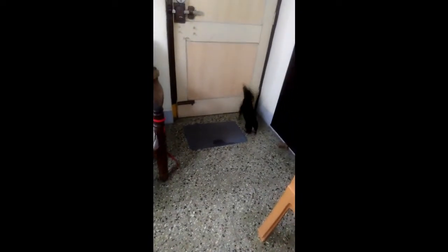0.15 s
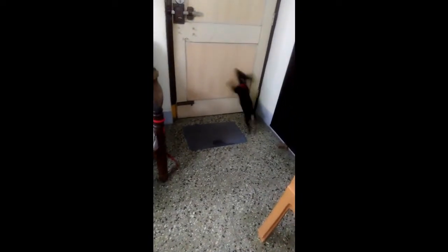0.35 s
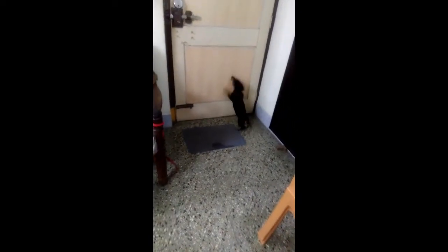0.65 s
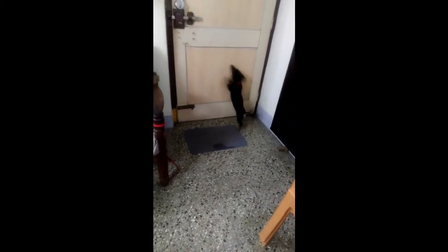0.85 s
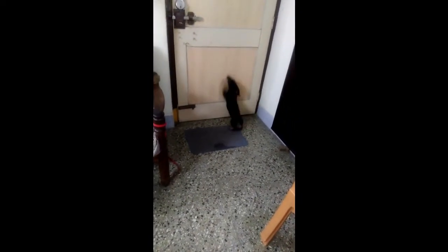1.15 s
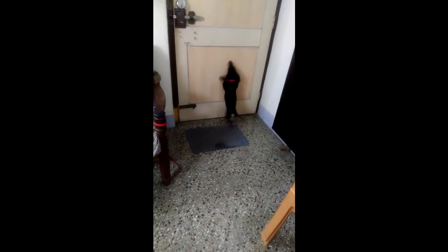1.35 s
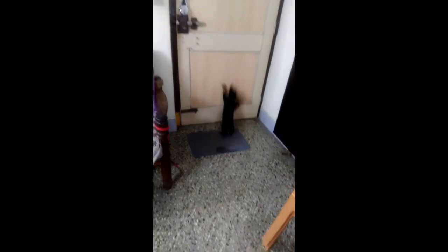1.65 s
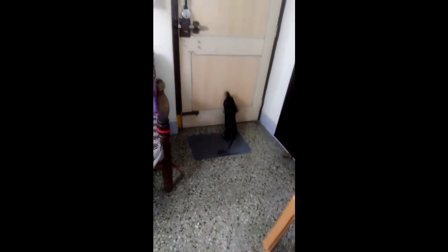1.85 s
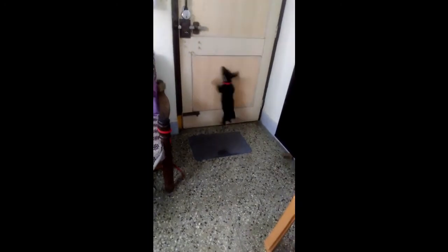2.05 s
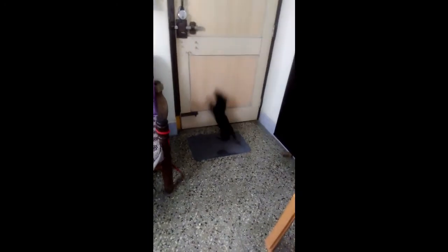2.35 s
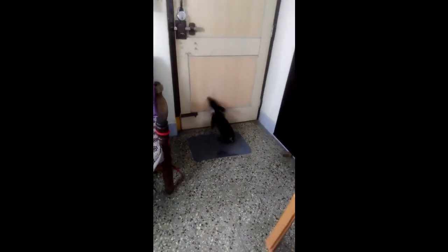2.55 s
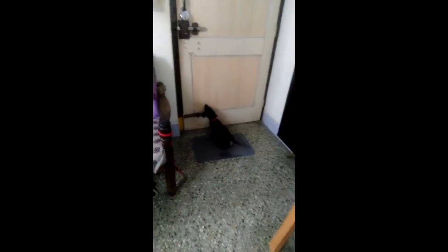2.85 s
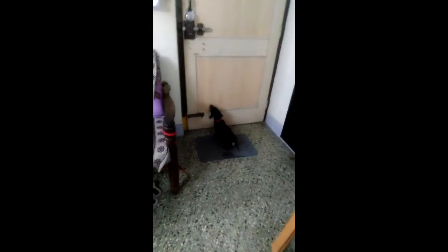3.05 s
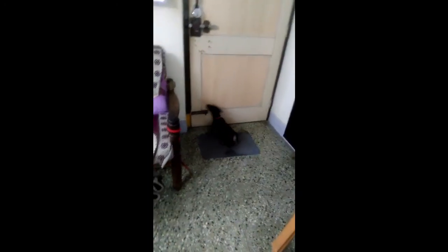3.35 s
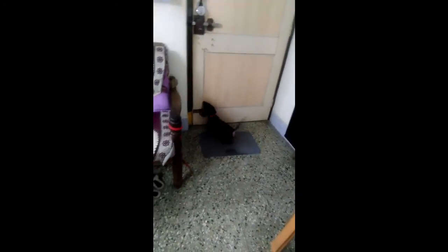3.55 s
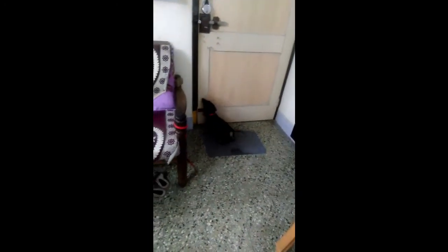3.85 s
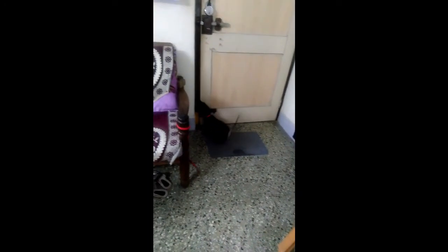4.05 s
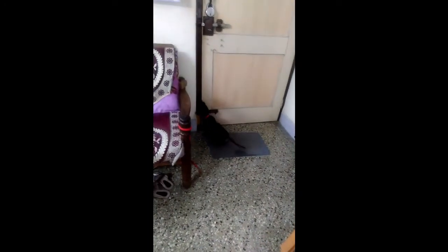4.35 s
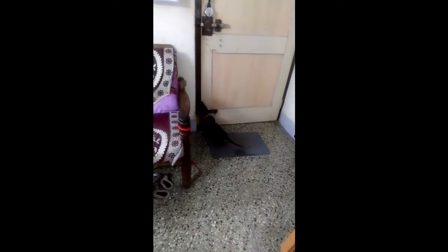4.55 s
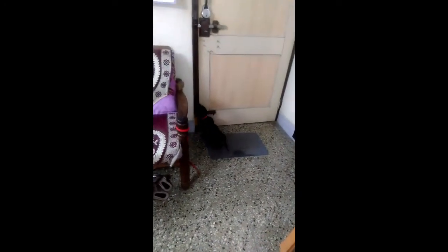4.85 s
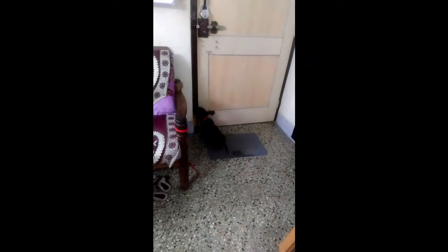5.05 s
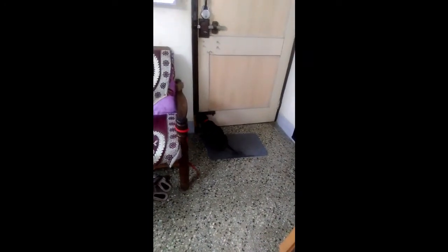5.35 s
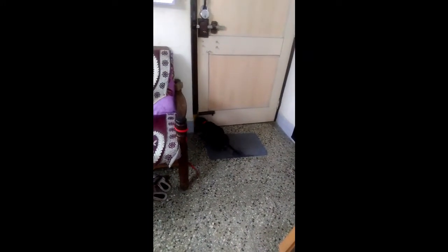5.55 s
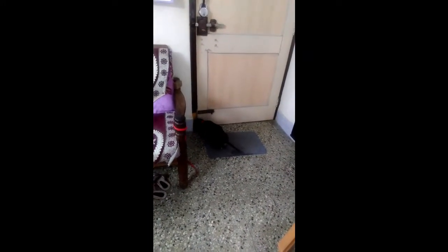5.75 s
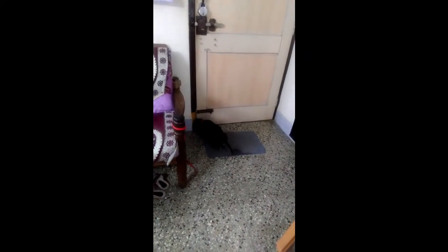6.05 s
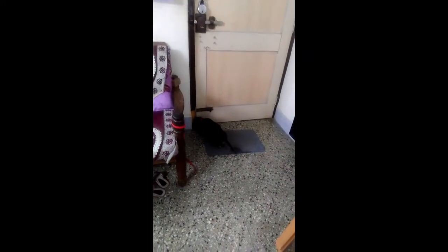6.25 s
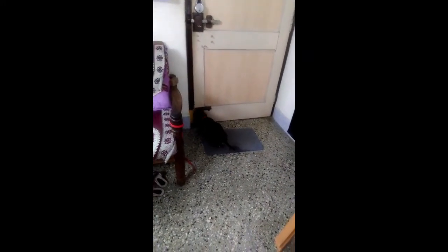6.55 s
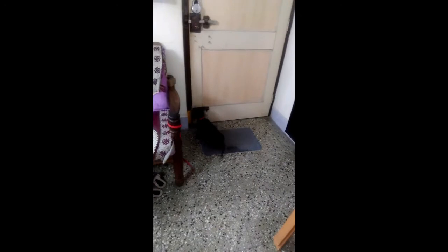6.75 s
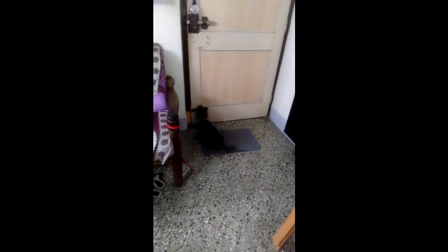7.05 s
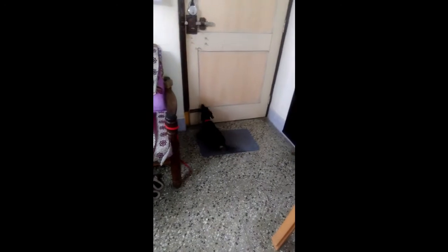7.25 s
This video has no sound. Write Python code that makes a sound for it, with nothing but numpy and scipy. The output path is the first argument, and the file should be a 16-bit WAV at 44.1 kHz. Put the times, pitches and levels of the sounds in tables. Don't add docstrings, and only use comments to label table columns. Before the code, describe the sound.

Claws scrape and paws bump a wooden door as a little dog whimpers, then sparse high yelps and thin nose whistles over soft room hush.

```python
import sys
import numpy as np
from scipy import signal
from scipy.fft import rfft, irfft, next_fast_len
from scipy.io import wavfile
from scipy.ndimage import uniform_filter1d, map_coordinates

SR = 44100
rng = np.random.default_rng(int(sys.argv[2]) if len(sys.argv) > 2 else 0)


def store_pcm(level_fs):
    pcm = np.round(np.clip(level_fs, -1, 1) * 32767).astype(np.int16)
    wavfile.write(sys.argv[1], SR, np.atleast_2d(pcm).T)


def volts_from_db(level):
    exponent = np.asarray(level, float) / 20
    return 10 ** exponent


N = 325987

# (frequency [Hz], level per Hz [dB])
AIR_COLOUR = [(12, -54), (20, 8.5), (158, -0.5), (273, -7), (297, -2.5), (380, -8.5), (559, -7.5),
              (642, -13), (697, -8.5), (1140, -19.5), (1830, -19.5), (2680, -21.5), (3350, -29),
              (3740, -32), (14400, -45.5)]
# (time [s], level [dB])
AIR_LEVEL = [(0, -51.5), (1, -50), (3, -47.5), (3.6, -55), (4.3, -51.5), (4.7, -54), (5.6, -53.5),
             (6.2, -55.5), (7.39, -50.5)]
# (frequency [Hz], rms level [dB])
HUM = [(64.6, -67.5), (161.5, -70), (301.5, -70), (549.1, -76), (699.8, -86.5), (1475, -85)]

# (time [s], pitch [Hz], effort [dB])
WHINES = [
    ((-10.5, 8, 1.5, 2), [(.126, 560, -40), (.144, 655, -38), (.17, 764, -32.5), (.215, 788.6, -34.5), (.27, 686, -34.5), (.35, 640.4, -40.5), (.392, 821.5, -33.5), (.43, 822, -54)]),
    ((-23.5, 6, 3.5, 3.5), [(.7, 798, -28), (.715, 802, -37.5), (.774, 793, -28.5), (.79, 733, -40), (.825, 715, -54), (.87, 724.3, -50)]),
    ((-11, 3, -1.5, -4), [(1.12, 719, -38.5), (1.155, 805, -34.5), (1.198, 664, -40), (1.28, 635.4, -39.5), (1.302, 741, -33.5), (1.356, 699.4, -38), (1.42, 725, -52)]),
    ((-13.5, 6.5, -7.5, 3.5), [(2.05, 593, -30), (2.08, 735.6, -38.5), (2.105, 678, -24.5), (2.116, 707, -31), (2.14, 704, -52.5), (2.2, 716.6, -42), (2.27, 706, -71)]),
    ((-12, 4.5, -3, -0.5), [(3.79, 578, -52.5), (3.812, 652, -36), (3.828, 748, -34.5), (3.856, 700.4, -31), (3.9, 743.4, -31.5), (3.95, 798, -34), (3.99, 815.3, -35.5), (4.01, 850, -53), (4.06, 831, -47)]),
]
MOANS = [
    ((-8.5, 4, -7, -9.5), [(1.57, 653, -59), (1.586, 601, -38.5), (1.622, 641.7, -44.5), (1.74, 563, -42.5), (1.76, 496.6, -32), (1.852, 448.4, -43), (1.87, 437, -31)]),
    ((-6.5, 5.5, -6, -4), [(1.985, 453, -35.5), (2.008, 453.6, -46), (2.02, 484, -25), (2.046, 508, -50)]),
    ((-6.5, 11.5, 1.5, -2), [(2.3, 885, -35.5), (2.335, 969, -32), (2.37, 687, -36), (2.39, 652, -38), (2.43, 633, -39.5), (2.515, 538.4, -37)]),
    ((-10.5, -3.5, -3.5, -7.5), [(2.52, 391.6, -30.5), (2.54, 375.3, -35), (2.62, 375.7, -52.5)]),
    ((-15.5, 3, -2, -17), [(2.75, 702, -36), (2.77, 765, -27), (2.805, 546.4, -37), (2.86, 457, -33.5), (2.892, 442, -32), (3.05, 358.2, -29)]),
    ((3, 1.5, -10, -35), [(3.055, 310.7, -38), (3.125, 284.5, -41), (3.217, 281.4, -51), (3.25, 279, -63)]),
]
YELPS = [
    ((-3, 17, 6.5, -12.5), [(5.047, 1689, -38.5), (5.058, 1560, -43), (5.063, 1507, -28.5), (5.085, 1295, -37), (5.112, 868, -27), (5.135, 683, -32), (5.154, 613, -34), (5.208, 538, -39), (5.25, 553, -70)]),
    ((2, 31.5, -2.5, -12.5), [(5.378, 853, -53), (5.405, 843.6, -32.5), (5.43, 592.4, -32.5), (5.455, 451, -30), (5.482, 357, -24), (5.53, 366.7, -40), (5.555, 370, -36)]),
    ((-9.5, 17.5, 8.5, -10), [(6.522, 1630, -53), (6.536, 1566, -45), (6.540, 1500, -31), (6.556, 1203, -36), (6.58, 1112, -26.5), (6.598, 859, -27), (6.63, 724, -28), (6.7, 587, -34), (6.735, 440, -28.5), (6.8, 363.3, -36)]),
    ((-0.5, 27.5, -0.5, -4), [(6.98, 1414, -45), (6.998, 1209, -37), (7.023, 1076, -35.5), (7.055, 702, -34), (7.095, 618.3, -34), (7.183, 543, -36.5), (7.2, 526.3, -30), (7.225, 473, -38.5), (7.3, 524, -72)]),
]
WHIMPERS = [
    ((-10, 21, -1.5, -9), [(0.0, 472, -41.5), (.04, 441.4, -60.5)]),
    ((2.5, -10, -1, -15), [(3.37, 1042, -64), (3.384, 1148, -44), (3.41, 1150, -59), (3.45, 1087, -69)]),
    ((2.5, 1, -21.5, -21), [(4.2, 694, -53), (4.488, 616, -64.5), (4.53, 618.4, -67), (4.81, 670.5, -65.5), (4.9, 677, -70)]),
    ((-1, 5, -22, -11.5), [(.62, 439, -47.5), (.65, 486.5, -42), (.685, 575, -46.5), (.698, 600, -56)]),
]
CRACKED_CRY = [
    ((-20.5, 2.5, 3.5, 7.5), [(3.462, 934, -27.5), (3.487, 899, -46), (3.495, 878, -27.5), (3.524, 868, -43), (3.535, 860, -22.5), (3.562, 853.5, -35), (3.575, 808.5, -40), (3.6, 825, -46)]),
]
UNSTEADINESS = [.9, .6, .55, 1.5, 1.7]
THIRD_LIFT = [
    [0.1, 0.12, 0.1, 0.1, 1.6],
    [0.1, 0.092, 0.1, 0.1, 0.1, 0.11],
    [2.8, 3.3, 3.3, 22],
    [24, -9, 4.5, -13],
    [-1.5],
]
SNOUT_SHARE = [.5, .4, 1, .1, 0]
# (frequency [Hz], level [dB])
THROAT = [(500, 5.5), (800, 6), (1100, -9), (1300, -6), (1600, -2), (1950, -3.5), (2400, 3.5), (2900, 0),
          (3350, -1), (4000, -5.5), (5000, -4.5), (6400, -3.5), (8500, -9.5), (14000, -22)]
# (frequency [Hz], level [dB])
CHEST = [(300, 2), (450, 4.5), (650, 4), (800, -6.5), (1100, -2), (1600, 7)]
# (frequency [Hz], level [dB])
SNOUT = [(1200, 0), (1600, 3), (2000, -4), (2400, 3), (2850, -4), (3350, 3), (3950, -12), (4600, 4.5),
         (5250, -7), (5850, 3), (6500, -3), (7500, 0)]
# (start [s], end [s])
CRACK_SPAN = (3.48, 3.59)
CRACK_DB = -11
OCTAVE_THROAT = 0.22
CLOSING_TILT = 1
GLIDE_BLUR_DB = 1.3
RASP_LAG_S, RASP_START_DB = 0.03, -13

# (time [s], peak level [dB], boom [dB], heave [dB])
PAWS = [(0.43, -42.5, -3, -4), (0.519, -37, -5, -20), (0.569, -47.5, 5.5, 11), (0.622, -46.5, 3.5, -3),
        (0.731, -47, -11, 12), (0.913, -25.5, -9, -4.5), (0.997, -31.5, -12, -4), (1.087, -38.5, -30, -8),
        (1.379, -20.5, -8, -28), (1.3975, -16, -26, -18), (1.4066, -16, -10, -24), (1.4249, -25, -1, -17),
        (1.46, -40, 4, -1), (1.489, -34, -12, 11), (1.536, -22.5, -11, -10), (1.574, -29, -6, -9),
        (1.647, -35, 1.5, -11), (1.69, -33, -10, -16), (1.775, -54.5, 17.5, -15), (1.82, -53.5, 21.5, -8),
        (1.94, -43.5, 7, -1), (2.099, -40, -4, -11), (2.366, -27, -11.5, -34), (2.596, -28, -10.5, -8),
        (2.684, -34, -19, -23), (2.705, -25, -5, -5), (2.773, -27.5, -11.5, 4), (2.85, -35, -6, -16),
        (2.99, -51, 6, 10.5), (3.099, -59, 5, 10), (3.201, -56, 15, 18.5)]
# (frequency [Hz], width [Hz], level [dB])
PANEL = [(111, 15, 1), (150, 24, -14), (245, 20, -19)]
# (frequency [Hz], width [Hz], level [dB])
BOOM = [(67, 11, 4)]
# (frequency [Hz], width [Hz], level [dB])
HEAVE = [(35.8, 2.38, 2.5)]
# (frequency [Hz], width [Hz], level [dB])
SWAY = [(48, 4, 5.3)]
LATCH_SIDE_S = 1.7
RATTLE_S = 0.059

# (time [s], peak level [dB], scrape length [s], knock [dB])
CLAWS = [(0.498, -32.5, 0.017, -48), (0.7703, -35.5, 0.024, -20), (0.792, -30.5, 0.016, -9.5),
         (0.8287, -38, 0.034, -2), (0.907, -25.5, 0.019, -15.5), (0.981, -23, 0.0086, -43),
         (1.3715, -17, 0.024, -19.5), (1.4437, -15.5, 0.018, -9.5), (1.517, -36, 0.069, -2.5),
         (1.6137, -33, 0.068, -8), (1.725, -31.5, 0.024, -5.5), (2.207, -26, 0.025, -24),
         (2.25, -38.5, 0.077, -27), (2.376, -20.5, 0.017, -13.5), (2.4498, -35, 0.13, -11.5),
         (2.572, -27, 0.029, -44), (2.673, -22, 0.019, 3), (2.739, -33, 0.034, 2.5),
         (2.923, -42.5, 0.0091, 13.5), (5.37, -47.5, 0.0099, 11)]
# (frequency [Hz], level per Hz [dB])
SCRAPE = [(880, -46), (1500, -43), (1620, -26), (1830, -28), (2080, -16.5), (2480, -6.5), (2650, -8.5),
          (5400, -19.5), (8530, -34), (14000, -48)]
# (frequency [Hz], width [Hz], level [dB])
KNOCK = [(242.6, 15.7, 3.5), (410, 73, -5), (650, 130, -5.5), (1016, 170, -9), (1990, 1120, -9.5)]
# (time [s], peak level [dB])
TICKS = [(0.5039, -46), (0.7939, -30.5), (0.9195, -36.5), (0.9821, -30), (1.368, -25), (1.4516, -21),
         (1.4666, -36), (1.6108, -40), (2.2135, -27.5), (2.378, -29), (2.6816, -24)]
# (time [s], peak level [dB])
HARDEST_TICK = (1.4437, -12)
# (frequency [Hz], width [Hz], level [dB])
PANEL_FACE = [(1500, 170, -28), (2550, 240, 6), (3010, 470, 5), (4170, 730, -1), (5370, 790, -11.5)]

# (time [s], length [s], first pitch [Hz], last pitch [Hz], peak level [dB])
WHISTLES = [
    (0.606, 0.02, 4050, 3800, -43),
    (3.329, 0.039, 3595, 3459, -53.5),
    (4.938, 0.054, 3574, 3498, -46),
    (4.198, 0.069, 4487, 4750, -48.5),
    (4.373, 0.069, 4280, 4460, -43),
    (4.985, 0.07, 4575, 4966, -43.5),
    (5.638, 0.078, 4240, 4770, -42.5),
]
# (time [s], length [s], first pitch [Hz], last pitch [Hz], peak level [dB])
SQUEAKS = [
    (3.4, .17, 12250, 12950, -58),
    (4.99, .11, 12600, 13100, -59),
    (6.49, .06, 12965, 12940, -60),
]
# (frequency [Hz], level per Hz [dB])
PUFF = [(2000, -11), (5000, -0.5), (9000, -9.5), (14000, -41)]
SWELL, GLIDE = 0.18, 0.74
SWELL_DB, WANE_DB = 10, 12.5

# (frequency [Hz], time to fall 60 dB [s])
WALLS = [(40, 1), (300, 0.43), (1500, 0.52), (5000, 0.36), (12000, 0.33)]
# (frequency [Hz], level [dB])
MIC = [(3300, 0), (3700, -2), (4050, -4), (4400, -1.5), (4800, -1)]
# (frequency [Hz], level per Hz [dB])
SIDE_COLOUR = [(2060, -67), (3500, -38), (4360, -38), (4510, -32), (4820, -8.5), (10100, -3.5),
               (14400, -30)]


def unit(x):
    return x / np.sqrt(np.mean(x ** 2) + 1e-20)


def along(points, hz):
    f, v = np.transpose(points)
    return np.interp(np.log(hz + 1), np.log(f + 1), v)


def wobble(rate, size=N):
    knots = rng.standard_normal(int(size * rate / SR) + 4)
    return map_coordinates(knots, [np.arange(size) * rate / SR])


def filtered(x, response):
    m = next_fast_len(N + SR)
    return irfft(rfft(x, m) * response(np.fft.rfftfreq(m, 1 / SR)), m)[..., :N]


def modes(table):
    def response(f):
        total = 0
        for k, (centre, width, db) in enumerate(table):
            resonance = 1j * f * width / (centre * centre - f * f + 1j * f * width)
            total = total + (-1) ** k * volts_from_db(db) * resonance
        return total
    return response


def played(rows, fade):
    s, *cols = np.transpose(rows)
    t = np.arange(max(s[0] - fade / 2, 0), s[-1] + fade / 2, 1 / SR)
    gate = np.clip(np.minimum(t - t[0], t[-1] - t) / fade, 0, 1)
    return round(t[0] * SR), t, gate, [np.interp(t, s, c) for c in cols]


def bursts(rows, rise, rough_db):
    out, t = np.zeros(N + SR), np.arange(SR // 4) / SR
    for s, db, decay in rows:
        shape = (1 - np.exp(-t / rise)) * np.exp(-t / max(decay, 0.002))
        grain = volts_from_db(db + rough_db * wobble(287.6, size=len(t)))
        out[round(s * SR):][:len(t)] += grain * shape * rng.standard_normal(len(t))
    return out[:N]


def struck(hits, table, soft_hz):
    force = bursts([(s, db - 41, rattle) for s, db, rattle in hits], rise=0.005, rough_db=4)
    for s, db, _ in hits:
        force[round(s * SR)] += volts_from_db(db)
    return filtered(force, lambda f: modes(table)(f) / (1 + 1j * f / soft_hz) ** 2)


def air():
    t = np.arange(N) / SR
    rush = filtered(rng.standard_normal(N), lambda f: volts_from_db(along(AIR_COLOUR, f)))
    swell_db = 1.2 * wobble(3)
    hum = np.zeros(N)
    for hz, db in HUM:
        level = volts_from_db(db + 7.5 + 2.4 * wobble(6.1))
        hum += level * np.sin(2 * np.pi * hz * t + 0.8 * wobble(14.0))
    return volts_from_db(np.interp(t, *np.transpose(AIR_LEVEL)) + swell_db) * unit(rush) + hum


def cry_curves():
    curves, gate = np.zeros((8, N)), np.zeros(N)
    kinds = [WHINES, MOANS, YELPS, WHIMPERS, CRACKED_CRY]
    for cries, unsteady, lifts, narrow in zip(kinds, UNSTEADINESS, THIRD_LIFT, SNOUT_SHARE):
        for ((octave_db, closing_db, opening, rasp_db), rows), lift_db in zip(cries, lifts):
            at, t, edge, (hz, effort_db) = played(rows, fade=0.008)
            done = (t - t[0]) / (t[-1] - t[0])
            closed_db = closing_db * done
            second_db = effort_db + octave_db - closed_db
            tilt = opening - CLOSING_TILT * closed_db
            hoarse_db = rasp_db + RASP_START_DB * np.exp((t[0] - t) / RASP_LAG_S)
            curves[:, at:at + len(t)] = np.broadcast_arrays(
                hz, effort_db, second_db, tilt, hoarse_db, unsteady, lift_db * done, narrow)
            gate[at:at + len(t)] += edge
    return curves, gate


def voice():
    curves, gate = cry_curves()
    on = np.flatnonzero(gate)
    t = on / SR
    smooth = uniform_filter1d(curves[:, on], size=120, axis=1)
    hz, effort_db, second_db, opening, rasp_db, unsteady, third_db, narrow = smooth
    db = effort_db + along(CHEST, hz)
    octave_colour = along(THROAT, 2 * hz)
    second_db = second_db + OCTAVE_THROAT * octave_colour
    jitter = unsteady * (0.015 * wobble(45) + 0.016 * wobble(220))[on]
    phase = 2 * np.pi * np.cumsum(hz * (1 + jitter)) / SR

    glide = uniform_filter1d(np.abs(np.gradient(np.log2(hz))) * SR, size=400)
    blur_db = np.minimum(GLIDE_BLUR_DB * glide, 12) * narrow
    flutters = [4 * wobble(50)[on] for _ in range(4)]
    stack = volts_from_db(db) * np.sin(phase)
    for k in range(2, 20):
        gain_db = second_db + flutters[k % 4] + opening * np.log2(k / 2)
        gain_db = gain_db + along(THROAT, k * hz) - octave_colour
        gain_db = gain_db + third_db * (k == 3) - blur_db * min((k - 2) / 2, 1)
        drowned = 1 + (k * hz / 5600) ** 6
        stack += volts_from_db(gain_db) / drowned * np.sin(k * phase)

    cracking = (t > CRACK_SPAN[0]) * (t < CRACK_SPAN[1])
    half = volts_from_db(CRACK_DB) * cracking * np.sin(phase / 2)
    level = np.minimum(gate[on], 1) * volts_from_db((1.5 + 1.3 * unsteady) * wobble(60)[on])
    tone, rasp, share = np.zeros((3, N))
    share[on] = narrow
    tone[on] = np.sqrt(2) * level * (stack + half * (volts_from_db(db) + 0.5 * stack))
    pulsed = (1 + 0.9 * np.sin(phase)) * rng.standard_normal(len(t))
    rasp[on] = level * volts_from_db(second_db + rasp_db + blur_db / 4) * pulsed
    hoarse = filtered(rasp, lambda f: volts_from_db(1.7 * along(THROAT, f) + 8.5) * f ** 2 / (f ** 2 + 900 ** 2))
    cry = tone + hoarse
    return (1 - share) * cry + filtered(share * cry, lambda f: volts_from_db(along(SNOUT, f)))


def door():
    bends = [(s, db + 49, RATTLE_S) for s, db, _, _ in PAWS]
    booms = [(s, db + rel + 60, RATTLE_S) for s, db, rel, _ in PAWS]
    heaves = [(s, db + rel + 73, RATTLE_S) for s, db, _, rel in PAWS if s > LATCH_SIDE_S]
    sways = [(s, db + rel + 60, RATTLE_S) for s, db, _, rel in PAWS if s < LATCH_SIDE_S]
    panel = struck(bends, PANEL, soft_hz=298)
    boom = struck(booms, BOOM, soft_hz=403)
    heave = struck(heaves, HEAVE, soft_hz=201)
    sway = struck(sways, SWAY, soft_hz=199)
    return panel + boom + heave + sway


def claws():
    scrapes = bursts([(s, db, length) for s, db, length, _ in CLAWS], rise=0.004, rough_db=5)
    blows = [(s, db + knock, length) for s, db, length, knock in CLAWS]
    knocks = bursts(blows, rise=0.00027, rough_db=4.5)
    scratch = filtered(scrapes, lambda f: volts_from_db(along(SCRAPE, f)))
    thud = filtered(knocks, lambda f: modes(KNOCK)(f) / (1 + 1j * f / 3000) ** 3)
    return volts_from_db(6.5) * scratch + volts_from_db(15) * thud


def ticks():
    hits = [(s, db, 0.0025) for s, db in [*TICKS, HARDEST_TICK]]
    taps = bursts(hits, rise=0.0002, rough_db=2)
    return volts_from_db(6) * filtered(taps, lambda f: modes(PANEL_FACE)(f) / (1 + 1j * f / 7000) ** 2)


def whistles():
    out, breath = np.zeros(N), np.zeros(N)
    for s, length, first_hz, last_hz, peak_db in [*WHISTLES, *SQUEAKS]:
        peak_hz = first_hz + GLIDE * (last_hz - first_hz)
        rows = [(s, first_hz, peak_db - SWELL_DB),
                (s + SWELL * length, peak_hz, peak_db),
                (s + length, last_hz, peak_db - WANE_DB)]
        at, t, gate, (hz, db) = played(rows, fade=0.03)
        low = hz < SR / 6
        spread_hz = np.where(low, 135, 160) * wobble(259, size=len(t))
        phase = 2 * np.pi * np.cumsum(hz + spread_hz) / SR
        octave = volts_from_db(-26) * low * np.sin(2 * phase)
        level = volts_from_db(db + 4 + 2.5 * wobble(80, size=len(t)))
        out[at:at + len(t)] += gate * level * (np.sin(phase) + octave)
        breath[at:at + len(t)] += gate * low * volts_from_db(db - 5) * rng.standard_normal(len(t))
    return out + filtered(breath, lambda f: volts_from_db(along(PUFF, f)))


def room(x):
    hz, t, z = signal.stft(rng.standard_normal(SR), SR, nperseg=256)
    dying = volts_from_db(-60 * t / along(WALLS, hz)[:, None])
    tail = signal.istft(z * dying, SR, nperseg=256)[1]
    tail = np.pad(tail / np.linalg.norm(tail), (150, 0))
    tail[rng.integers(40, 1300, size=9)] += volts_from_db(-10) * rng.choice([-1, 1], size=9)
    return signal.fftconvolve(x, tail)[:N]


def scene():
    background = air()
    near = voice() + whistles()
    wood, nails = door(), claws() + ticks()
    puppy = volts_from_db(-3.5) * near + volts_from_db(-5) * room(near)
    mono = puppy + wood + nails + room(volts_from_db(-4.5) * wood + volts_from_db(-2.5) * nails)
    mono = filtered(mono, lambda f: volts_from_db(along(MIC, f))) + background
    mono = filtered(mono, lambda f: (f < 14300) * f ** 4 / (f ** 4 + 31 ** 4))
    return np.array([mono, mono])


def top_cut(x):
    return signal.sosfilt(signal.butter(12, 14330, fs=SR, output="sos"), x)


def record(dry):
    treble = filtered(dry[0], lambda f: f ** 4 / (f ** 4 + 16000 ** 4))
    treble_level = np.sqrt(np.abs(uniform_filter1d(treble ** 2, size=512)))
    hiss = unit(filtered(rng.standard_normal(N), lambda f: volts_from_db(along(SIDE_COLOUR, f))))
    side = volts_from_db(9.5) * treble_level * hiss
    return top_cut(dry + np.array([side, -side]))


dry = scene()
out = record(dry)
store_pcm(out)
```